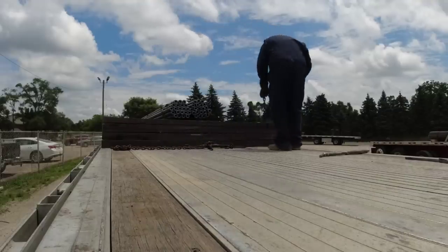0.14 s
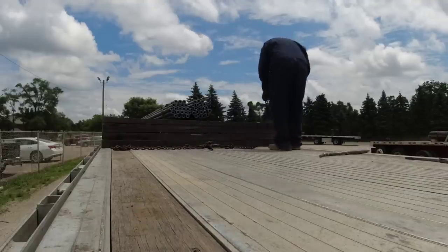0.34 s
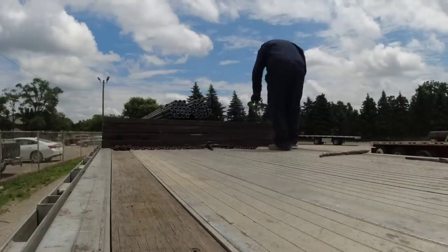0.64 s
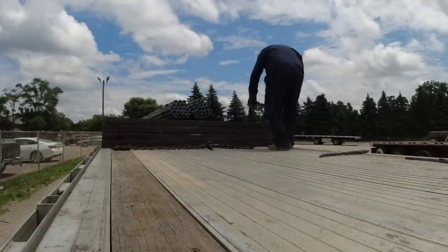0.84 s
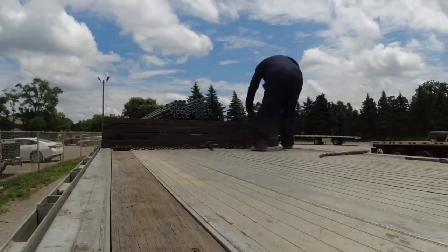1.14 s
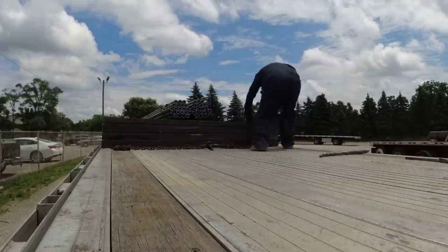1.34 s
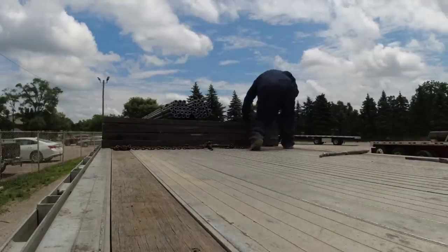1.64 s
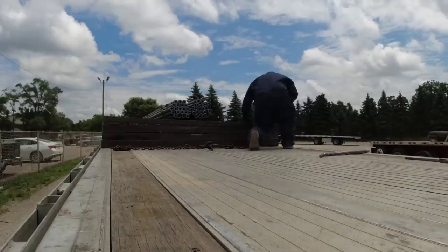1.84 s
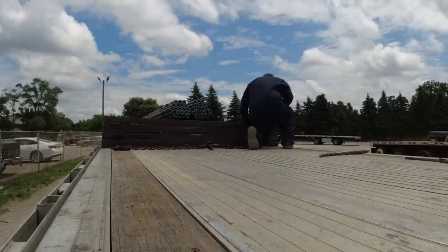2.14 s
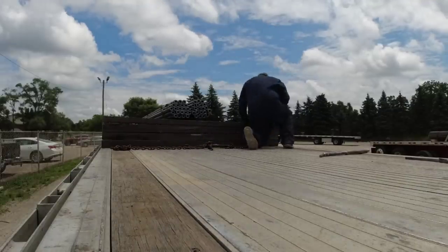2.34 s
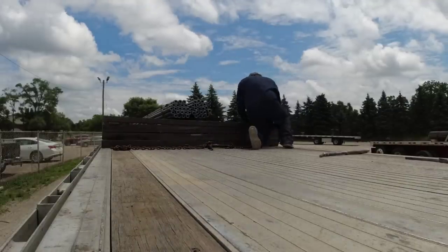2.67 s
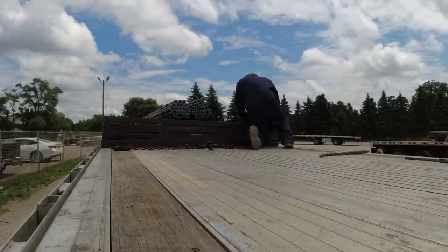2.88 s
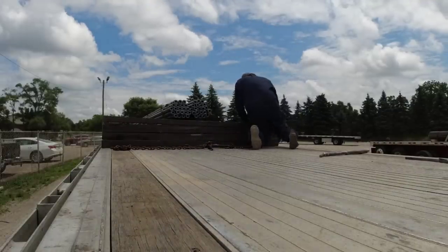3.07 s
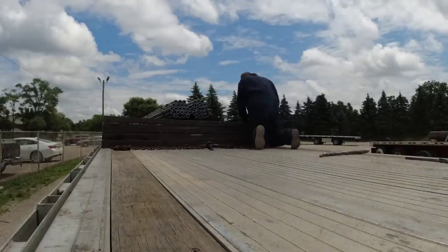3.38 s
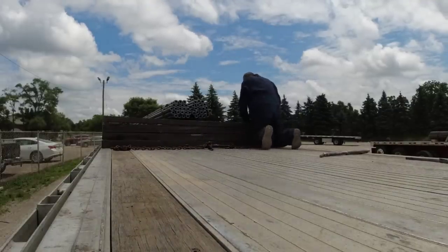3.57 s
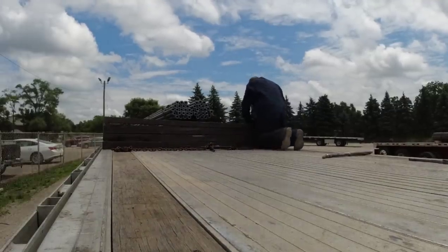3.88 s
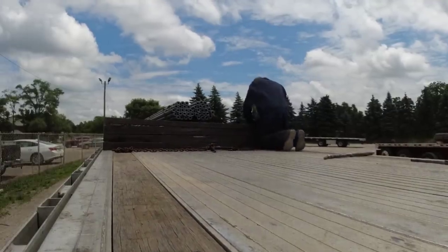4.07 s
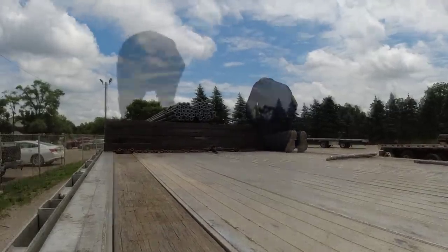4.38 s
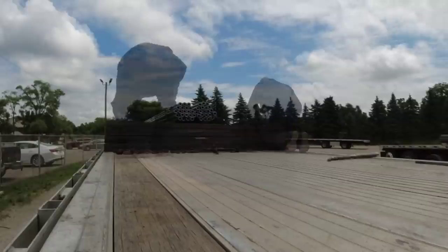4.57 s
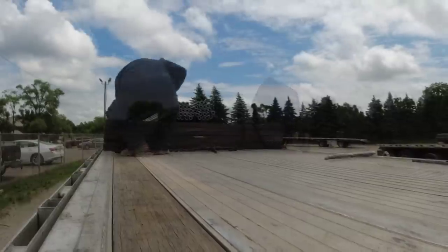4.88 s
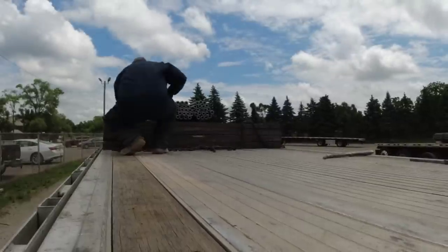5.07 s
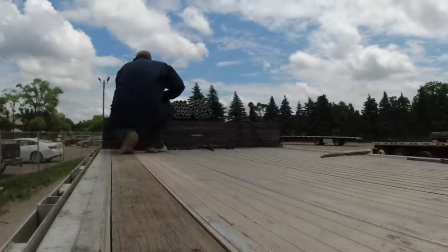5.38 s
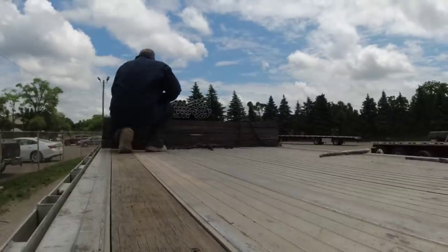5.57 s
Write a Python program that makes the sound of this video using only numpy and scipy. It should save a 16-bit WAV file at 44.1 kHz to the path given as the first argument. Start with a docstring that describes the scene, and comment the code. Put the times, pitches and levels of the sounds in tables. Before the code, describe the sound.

Close mono pickup on a flatbed deck outdoors: a loud chain drop and short rattle, then scattered lighter clanks. Work pauses into dull body thuds, tiny metallic ticks and distant twittering, with wavering engine hum and airy noise beneath. Next comes a gritty, stuttering shove of a load, then a sharp clank and a long chain haul, rattling, pinging and scraping ever louder to the end.

```python
"""Heavy steel chains clank on the metal deck of a flatbed trailer outdoors, in short pulls and one long haul.
Falls ring the deck's modes and a dense noise wash; running chain is a stream of small blows and free clinks.
Links ping as very high sines, contacts tick as noise bursts, and hook fittings sound single notes.
A load is shoved as banded rattle, boots and knees thud on low deck modes, and ribbed cloth zips.
Behind are an idling engine of wavering tones, shaped-noise open air, a thin whine and gliding bird whistles."""
import sys
import numpy as np
from scipy import signal
from scipy.fft import rfft, irfft
from scipy.io import wavfile
from scipy.ndimage import uniform_filter1d

SR = 44100
rng = np.random.default_rng(int(sys.argv[2]) if len(sys.argv) > 2 else 0)


def bounce(signal):
    """Save signal as a 16-bit WAV file at the path given by the first command-line argument."""
    frames = np.transpose(np.atleast_2d(signal))
    limited = np.clip(frames, -1, 1)
    pcm = np.round(limited * 32767).astype(np.int16)
    wavfile.write(sys.argv[1], SR, pcm)


N = 252252
T = np.arange(N) / SR
RING_T = T[:SR * 3 // 5]  # time axis of one blow

# effort of the long haul, as loudness of the chain: t/s, level/dB
HAUL_EFFORT = [(4.91, -46), (4.918, -32.5), (5.082, -28), (5.124, -36.5), (5.316, -24), (5.374, -38),
               (5.428, -28), (5.58, -24.5), (5.62, -16), (5.72, -13.5)]
# deck clatter, deck boom, link scrape: low edge f/Hz, high edge f/Hz (held below half the sample rate)
CHAIN_BANDS = [(723, 2650), (162, 728), (2770, 38000)]


def amp(db):
    """Decibels to gain."""
    return 10 ** (np.asarray(db) / 20)


def evened(x):
    """Scales to rms 1."""
    return x / np.sqrt(np.mean(x ** 2) + 1e-20)


def attack_unit(x):
    """Scales a blow so that its first 20 ms have rms 1."""
    return x / np.sqrt(np.mean(x[:SR // 50] ** 2) + 1e-20)


def read(points, hz):
    """Reads a table on a log-frequency axis."""
    f, value = np.transpose(points)
    return np.interp(np.log(hz + 1), np.log(f), value)


def add(mix, s, sound):
    """Mixes a sound in at time s, cut off at the end of the mix."""
    part = mix[max(round(s * SR), 0):][:len(sound)]
    part += sound[:len(part)]


def band(x, lo_hz, hi_hz, order=3):
    """Causal band-pass."""
    edges = [lo_hz, min(hi_hz, SR / 2 - 100)]
    return signal.sosfilt(signal.butter(order, edges, "band", fs=SR, output="sos"), x)


def drift(size, rate_hz):
    """Random wander: straight lines between normal random values, rate_hz of them per second."""
    knots = rng.standard_normal(2000)
    return np.interp(T[:size] * rate_hz, np.arange(len(knots)), knots)


def deck_ring(ring=1.0, modes_db=-3, rise=0.00076, patchy_db=4):
    """The deck struck at a random spot: clear modes over a dense wash of plate and links, the treble dying first."""
    # clear modes of the deck: f/Hz, relative level/dB
    clear_modes = [(178, -9), (235, -5), (324, -8.5), (480, 3.5), (557, -14), (685, -2), (718, -0.5),
                   (775, 0), (860, 2), (1024, 2), (1089, 3.5), (1180, -4), (1218, 1.5), (1272, -0.5),
                   (1384, -7.5), (1535, -3), (1598, 1.5), (1657, 0), (1772, 1), (1970, 3), (2118, -6),
                   (2418, -20.5), (2492, 2), (2721, -0.5), (2804, -28), (3550, -2), (4296, -5), (4888, -5),
                   (5146, -14)]
    # dense wash of the plate, with the links' constant jingle near 14 kHz: f/Hz, relative level/dB per Hz
    wash_level = [(60, -29), (140, -6), (220, -1.5), (500, -1), (900, -3.5), (1300, 0.5), (2000, -5.5),
                  (3000, -6.5), (5200, -8.5), (7000, -18.5), (10000, -30.5), (12800, -49.5), (14000, -27),
                  (16000, -59.5)]
    # 60 dB decay time of modes and wash before the ring factor: f/Hz, t60/s
    ring_t60 = [(200, 0.59), (1000, 0.35), (2500, 0.23), (5000, 0.2), (10000, 0.13)]

    hz, t, z = signal.stft(rng.standard_normal(len(RING_T)), SR, nperseg=512)
    favoured = patchy_db * evened(uniform_filter1d(rng.standard_normal(len(hz)), 2))  # differs at each spot
    fade_db = 60 * t / (ring * read(ring_t60, hz)[:, None])
    z = z * amp((read(wash_level, hz) + favoured)[:, None] - fade_db)
    wash = signal.istft(z, SR, nperseg=512)[1][:len(RING_T)]

    f, db = np.transpose(clear_modes)[:, :, None]
    spot, phase = rng.random((2, len(clear_modes), 1))
    turns = (2 * np.pi * (f * RING_T + phase)).astype(np.float32)
    decay = np.exp((-np.log(1000) * RING_T / (1.01 * ring * read(ring_t60, f))).astype(np.float32))
    modes = (amp(db) * (.5 + spot) * decay * np.sin(turns)).sum(0)
    onset = 1 - np.exp(-RING_T / rise)
    return (attack_unit(wash) + amp(modes_db) * attack_unit(modes)) * onset


def clanks(level_db=-11, bright_db=-1, crack=0.61, crack_time=0.0055, touch_db=-13, touch_lead=0.0041):
    """Each fall touches lightly, cracks, rings the deck and rebounds; heavy falls boom, glancing ones are bright."""
    # chain falling on the deck: t/s, relative level/dB, weight as bass re middle/dB,
    # brightness as treble re middle/dB before the common bright_db
    falls = [(0.001, -17.5, -35, -11), (0.038, -15.5, -13, -7.5), (0.327, -40, -19, -21),
             (0.357, -41, 2.5, 3.5), (0.48, -33, -4.5, -0.5), (0.613, -38, -16, -5), (1.038, -44, -8, 14),
             (1.146, -29.5, -16, -17), (1.283, -27, -5.5, -2.5), (1.436, -23, -10, -10.5),
             (1.539, -23, -2, -4.5), (1.836, -34, -10, -7.5), (2.73, -43, 3.5, -6.5),
             (4.819, -9.5, -1.5, -9.5), (4.919, -17, -16.5, -29), (4.964, -21.5, 1, 4.5),
             (5.063, -25, 5, 2), (5.21, -25.5, 5.5, 5.5), (5.267, -12, -26, -8), (5.29, -13.5, 1.5, 2.5),
             (5.39, -20.5, -7, -1), (5.422, -14.5, -18, 0.5), (5.458, -16, -0.5, -31),
             (5.503, -11, -5.5, -5), (5.558, -12.5, 0.5, -10), (5.61, -6.5, -11, -9), (5.64, -7, -10.5, -3),
             (5.675, -13, -10, 3)]
    rebound_s, rebound_db = 0.03, -15.5  # the trailing links land just after each fall
    ring_per_db = 0.0556  # heavier falls ring longer: log growth of the ring time per dB of weight

    out = np.zeros(N)
    for s, db, weight, bright in falls:
        for late, softer_db in (0, 0), (rebound_s * rng.uniform(.8, 1.2), rebound_db):
            blow = deck_ring(ring=1.06 * np.exp(ring_per_db * weight))
            blow = blow * (1 + crack * np.exp(-RING_T / crack_time))
            boom = attack_unit(band(blow, 100, 700))
            middle = attack_unit(band(blow, 700, 2500))
            treble = attack_unit(band(blow, 2500, 16000))
            # the middle is inverted where the bands cross
            clank = amp(weight) * boom - middle + amp(bright + bright_db) * treble
            clank = amp(db + level_db + softer_db) * clank
            add(out, s + late, clank)
            add(out, s + late - touch_lead * (.5 + rng.random()), amp(touch_db) * clank)
    return out


def clink(low_hz=1100, high_hz=5200, t60=0.092, tilt=0.53, count=6):
    """A link under tension rings briefly at a few pitches of its own."""
    pitch, phase, length = rng.random((3, count, 1))
    hz = low_hz * (high_hz / low_hz) ** pitch
    t = RING_T[:SR // 5]
    decay = amp(-60 * t / (t60 * (.5 + length)))
    partials = (low_hz / hz) ** tilt * decay * np.sin(2 * np.pi * (hz * t + phase))
    return attack_unit(partials.sum(0) * (1 - np.exp(-t / 0.00028)))


def rattle(size, per_s, spread_db, clink_db, count=6, clinks_per_s=70):
    """A stream of link impacts of uneven size on several spots of the deck; some links clink freely."""
    out = np.zeros(size)
    for _ in range(count):
        chance, force = rng.random((2, size + len(RING_T) - 1))
        clicks = (chance < per_s / count / SR) * amp(spread_db * force)
        blow = deck_ring(ring=0.82, modes_db=-5.5, rise=0.0017, patchy_db=2.0)
        out += signal.fftconvolve(clicks, blow, "valid")
    free = np.zeros(size)
    for k, (late, force) in enumerate(rng.random((90 * size // SR, 2))):
        add(free, (k + late) / clinks_per_s, amp(10 * force) * clink())
    return evened(out) + amp(clink_db) * evened(free)


def slide(gains, bands_hz, per_s, spread_db, clink_db=-np.inf):
    """A rattle whose bands, each at rms 1, swell and fade with the movement."""
    links = rattle(len(gains[0]), per_s, spread_db, clink_db)
    out = 0
    for k, (lo, hi) in enumerate(bands_hz):
        out = out + (-1) ** k * evened(band(links, lo, hi)) * gains[k]
    return out


def stroke(t, length, attack, release_db_per_s):
    """Gain of one movement: attack, hold, release."""
    return np.clip(t / attack, 0, 1) * amp(-release_db_per_s * np.maximum(t - length, 0))


def haul(attack=.008):
    """The long haul: with more effort the links scrape much louder, while the deck's boom grows little."""
    # one row each for clatter, boom, scrape: level/dB at easy effort, growth/dB per dB of extra effort
    effort_law = [(-32, 1.0), (-31.5, 0.18), (-38.5, 1.3832)]
    steady_db = -30.5  # effort of a steady, easy haul

    out, t = np.zeros(N), T[:SR]
    s, db = np.transpose(HAUL_EFFORT)
    extra_db = np.interp(s[0] + t, s, db) - steady_db
    onset = np.minimum(t / attack, 1)
    gains = [amp(easy_db + follow * extra_db) * onset for easy_db, follow in effort_law]
    add(out, s[0], slide(gains, CHAIN_BANDS, per_s=220, spread_db=33, clink_db=-9.5))
    return out


def pulls():
    """Short lengths of chain run over the deck and settle."""
    # short pulls: start t/s, length t/s, clatter level/dB, brightness as scrape re clatter/dB
    short_pulls = [(0, 0.094, -29, -15.5), (0.213, .125, -67.5, 0), (0.326, 0.23, -49.5, -2),
                   (0.967, 0.17, -55, 7), (1.067, 0.16, -46.5, -10), (1.442, 0.061, -44, -37),
                   (1.559, 0.033, -35.5, -13)]
    boom_db, boom_follow = -22.5, 0.66  # deck boom: dB, dB per dB of clatter

    out, t = np.zeros(N), T[:2 * SR]
    gains = 0
    for s, length, db, bright in short_pulls:
        levels = amp([[db], [boom_db + boom_follow * db], [db + bright]])
        gains = gains + levels * stroke(t - s, length, attack=0.004, release_db_per_s=251)
    add(out, 0, slide(gains, CHAIN_BANDS, per_s=340, spread_db=15, clink_db=-4.5))
    return out


def meetings(base_db, follow, count=26):
    """Links meet at random along the hauled chain, harder with more effort: rows of (s, relative dB)."""
    s, db = np.transpose(HAUL_EFFORT)
    place = (1 + np.arange(count) + 2 * rng.random(count)) / (count + 2)
    when = s[0] + (s[-1] - s[0]) * place
    scatter_db = 1 * rng.standard_normal(count)
    return list(zip(when, base_db + follow * np.interp(when, s, db) + scatter_db))


def pings(level_db=-12, detune=0.0065, rise=0.0038, t60=0.23):
    """Thick links ring very high, each one tuned a little differently."""
    # link striking link: t/s, relative level/dB
    strikes = [(0.5671, -48), (1.3563, -53), (1.5933, -51), (2.6374, -41), (2.7317, -49), (4.8254, -47),
               (5.0794, -51), (5.2274, -32), (5.2969, -23.5), (5.456, -35), (5.6144, -31)]
    # ring of one link: f/Hz, relative level/dB
    link_modes = [(13520, 2.5), (14150, 10), (14480, 4), (14740, 6)]

    out = np.zeros(N)
    hz, mode_db = np.transpose(list(link_modes) * 3)[:, :, None]  # three detuned copies of each mode
    envelope = amp(-60 * RING_T / t60) * (1 - np.exp(-RING_T / rise)) ** 2
    for s, db in list(strikes) + meetings(base_db=-17, follow=1.15):
        tune, size, phase = rng.standard_normal((3, len(hz), 1))
        turns = (2 * np.pi * (hz * (1 + detune * tune) * RING_T + phase)).astype(np.float32)
        ring = (amp(mode_db + 8 * size) * np.sin(turns)).sum(0)
        add(out, s - rise / 2, amp(db + level_db) * attack_unit(ring * envelope))
    return out


def ticks(level_db=-13, width=1.54, t60=0.066, rise=0.00067):
    """Small, quickly damped contacts of hook and links that leave the deck still."""
    # light contacts: t/s, relative level/dB, centre f/Hz
    contacts = [(0.5673, -43, 10500), (1.3553, -43, 5160), (1.575, -33.5, 4400), (2.514, -55, 5000),
                (2.5606, -51.5, 4900), (2.6352, -40, 5740), (2.7202, -50, 6640), (3.229, -48.5, 4930),
                (5.309, -14, 4600), (5.5572, -19, 5350), (5.609, -17, 5700)]

    out = np.zeros(N)
    hauled = [(s, db, rng.uniform(5870, 10900)) for s, db in meetings(base_db=-9.5, follow=1.0)]
    envelope = amp(-60 * RING_T / t60) * (1 - np.exp(-RING_T / rise))
    for s, db, hz in list(contacts) + hauled:
        burst = rng.standard_normal(len(RING_T)) * envelope
        tick = attack_unit(band(burst, hz / width, hz * width, order=2))
        add(out, s - rise, amp(db + level_db) * tick)
    return out


def hook(rise=0.00079):
    """Heavier fittings, hook and ring, are knocked into one clear note above the clatter."""
    # knocked fittings: t/s, f/Hz, level/dB before the onset, t60/s
    notes = [(0.002, 2750, -25, 0.1), (0.0377, 1450, -8.5, 0.018), (1.287, 3940, -29.5, 0.03),
             (1.438, 2800, -44, .35), (1.54, 2040, -39.5, 0.26), (2.515, 5100, -51, 0.035),
             (2.639, 6720, -36.5, 0.059), (5.312, 5150, -18, 0.066), (5.457, 1236, -3.5, 0.031)]

    out = np.zeros(N)
    onset = 1 - np.exp(-RING_T / rise)
    for s, hz, db, t60 in notes:
        add(out, s, amp(db - 60 * RING_T / t60) * onset * np.sin(2 * np.pi * hz * RING_T))
    return out


def shoves():
    """The dull scuff of a load: each shove speeds up and slows down, most of its bands following the speed."""
    # pushes of the load: start t/s, length t/s, relative level/dB, tilt/dB per octave
    pushes = [(4.104, 0.35, -1, 1), (4.228, 0.021, -18.5, 8), (4.3, 0.029, -5, 5), (4.42, 0.071, -10, -3.5),
              (4.607, .18, -1.5, -2)]
    # rumble, grind, rasp, hiss, deck flex: low f/Hz, high f/Hz,
    # mid-stroke level/dB before each push's level and tilt, loss/dB at the slow ends
    scuff_bands = [(167, 370, -29, 6), (397, 735, -38.5, -1), (740, 2370, -43.5, 10),
                   (2430, 8700, -65.5, 8.5), (59.5, 103, -42.5, -4.5)]

    out, start = np.zeros(N), pushes[0][0]
    lo_hz, hi_hz, band_db, ends_db = np.transpose(scuff_bands)[:, :, None]
    octaves = np.log2(np.sqrt(lo_hz * hi_hz) / 250)  # the tilt pivots at 250 Hz
    gains = 0
    for s, length, db, tilt in pushes:  # short, bright ones are gritty catches within a longer shove
        t = start + T[:SR] - s
        speed = np.sin(np.pi * np.clip(t / length, 0, 1)) ** 2
        level = amp(db + band_db + tilt * octaves - ends_db * (1 - speed))
        gains = gains + level * stroke(t, length, attack=0.0036, release_db_per_s=127)
    add(out, start, slide(gains, [row[:2] for row in scuff_bands], per_s=260, spread_db=20))
    return out


def chatter(start=4.095, stop=4.385, slips_per_s=55, hz=1900, t60=0.008, level_db=-30, uneven=0.28):
    """The load sticks and slips as it starts to move, each slip a short ring."""
    turns = np.cumsum(slips_per_s * (1 + uneven * drift(N, 40))) / SR
    slips = np.diff(np.floor(turns), prepend=0) > 0
    slips = slips * (T > start) * (T < stop) * (.5 + rng.random(N))
    ring = np.sin(2 * np.pi * hz * RING_T) * amp(-60 * RING_T / t60) * (1 - np.exp(-RING_T / 0.00063))
    return amp(level_db) * signal.fftconvolve(slips, ring)[:N]


def thuds(level_db=-10, knock=0.73, knock_time=0.011, modes_db=0):
    """A soft contact of boot or knee knocks, and wakes only the deck's lower modes."""
    # boots and knees on the deck: t/s, relative level/dB, hardness as upper corner f/Hz
    contacts = [(1.390, -27, 1320), (2.509, -24, 620), (2.625, -19.5, 1370), (2.687, -22, 650),
                (2.759, -25, 420), (2.821, -33.5, 1360), (3.215, -33.5, 470), (4.033, -32.5, 520),
                (4.112, -20, 706), (4.401, -17.5, 700), (5.145, -18, 930)]
    # lowest deck modes, woken by a body's weight: f/Hz, relative level/dB, t60/s
    low_modes = [(174, -3, 0.18), (230.6, -9, 0.69), (329, -1, 0.47), (422, -10.5, 0.71), (498, -7, 0.28),
                 (698, 0, 0.19), (950, -1, 0.23)]

    out = np.zeros(N)
    hz, mode_db, t60 = np.transpose(low_modes)[:, :, None]
    for s, db, corner_hz in contacts:
        sign = rng.choice([-1, 1], hz.shape)
        modes = (amp(mode_db - 60 * RING_T / t60) * sign * np.sin(2 * np.pi * hz * RING_T)).sum(0)
        wash = deck_ring(ring=0.91, modes_db=-6.0, rise=0.00034, patchy_db=-0.5)
        wash = wash * (1 + knock * np.exp(-RING_T / knock_time))
        blow = attack_unit(band(wash, 163, corner_hz))
        blow = blow + amp(modes_db) * attack_unit(band(modes, 100, corner_hz))
        add(out, s, amp(db + level_db) * attack_unit(blow))
    return out


def cloth(jitter=0.059, level_db=-3.0, hiss_db=0):
    """Ribbed cloth zips as the worker kneels, its ribs catching ever faster: a rough rising tone in hiss."""
    # course of the zip: t/s, rib rate f/Hz, relative level/dB
    zip_course = [(1.641, 1704, -77), (1.69, 2330, -55.5), (1.74, 2740, -54), (1.805, 3000, -54.5),
                  (1.84, 4080, -63), (1.89, 4760, -73)]

    s, hz, db = np.transpose(zip_course)
    t = np.arange(s[0], s[-1], 1 / SR)
    turns = np.cumsum(np.interp(t, s, hz) * (1 + jitter * drift(len(t), 1600))) / SR
    harmonics_db = [6, 2, -24.0, -34]
    tone = sum(amp(k_db) * np.sin(2 * np.pi * (k + 1) * turns) for k, k_db in enumerate(harmonics_db))
    hiss = band(rng.standard_normal(N), 1200, 4900, order=2)[:len(t)]
    out = np.zeros(N)
    add(out, s[0], amp(np.interp(t, s, db) + level_db) * (evened(tone) + amp(hiss_db) * evened(hiss)))
    return out


def yard(air_db=-43.5, gust_db=-1.5, wobble=0.11, throb=0.65):
    """Open-air noise of drifting level and the wavering, throbbing tones of an idling engine."""
    # spectrum of the open air: f/Hz, relative level/dB per Hz
    air_spectrum = [(12, -39), (20, 1), (66, -3.5), (151, -15.5), (183, -12.5), (205, -16.5), (328, -19),
                    (555, -21), (693, -25), (818, -26), (3860, -43.5), (15000, -75)]
    # engine idle tones: f/Hz, rms level/dB
    idle_tones = [(39.3, -86), (58.8, -48), (88, -54), (118, -61), (177, -57)]

    shape = amp(read(air_spectrum, np.fft.rfftfreq(N, 1 / SR)))
    air = irfft(rfft(rng.standard_normal(N)) * shape, N)
    engine = np.zeros(N)
    for hz, db in idle_tones:
        swell = 1 + throb * drift(N, 54)
        tone = np.sin(2 * np.pi * (hz * T + wobble * drift(N, 1.8)))
        engine += amp(db) * evened(swell * tone)
    return amp(air_db + gust_db * drift(N, 1.99)) * evened(air) + engine


def whine(hz=5580, level_db=-85.5):
    """A thin sine of steady level whose phase wanders."""
    return amp(level_db) * np.sin(2 * np.pi * hz * T + drift(N, 10))


def birds(waver=0.03, far_count=22, far_db=-65.0):
    """Faint gliding whistles; another bird twitters at random among them."""
    # bird whistles: t/s, length t/s, first f/Hz, last f/Hz (before the waver), peak level/dB
    whistles = [(0.775, 0.056, 5560, 4140, -69), (1.904, 0.087, 4800, 3540, -64),
                (2.304, 0.072, 4750, 3570, -69), (2.44, 0.032, 4460, 3320, -66),
                (2.56, 0.044, 2910, 3550, -64), (2.79, .06, 2900, 3450, -63),
                (2.89, 0.078, 4600, 4120, -68), (2.925, 0.043, 4200, 3300, -67),
                (3.26, 0.088, 3290, 4050, -67), (3.334, 0.086, 3250, 2980, -63)]

    out = np.zeros(N)
    far = []
    for when, long, first, last in rng.random((far_count, 4)):
        far.append((1.5 + 1.8 * when, 0.0194 + 0.0343 * long, 2600 + 1500 * first, 2600 + 1200 * last, far_db))
    for s, length, first_hz, last_hz, db in list(whistles) + far:
        u = np.linspace(0, 1, int(length * SR))
        pitch = (first_hz + u * (last_hz - first_hz)) * (1 + waver * drift(len(u), 577))
        add(out, s, amp(db) * np.sin(np.pi * u) * np.sin(2 * np.pi * np.cumsum(pitch) / SR))
    return out


def scene():
    """Sums chain, load, worker and surroundings into one channel."""
    chain = clanks() + pulls() + haul() + pings() + ticks() + hook()
    load = shoves() + chatter()
    worker = thuds() + cloth()
    return (chain + load + worker + yard() + whine() + birds())[None]


def record(dry):
    """Rounds off the loudest peaks, then limits the band with a linear-phase low-pass."""
    rounded = dry / (1 + (dry / .9) ** 4) ** .25
    lowpass = signal.firwin(511, 15750, window=("kaiser", 9), fs=SR)  # cutoff in Hz
    return signal.oaconvolve(rounded, lowpass[None], "same")


dry = scene()
out = record(dry)
bounce(out)
```